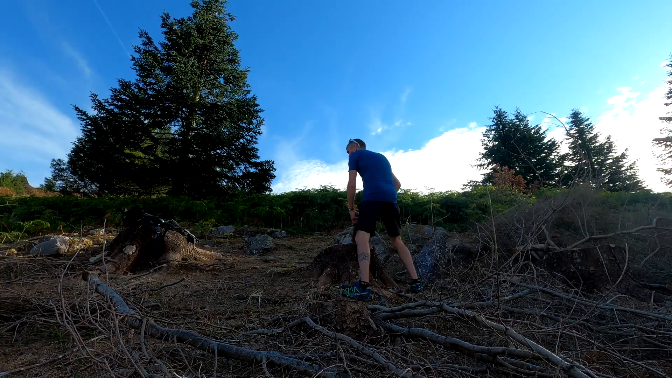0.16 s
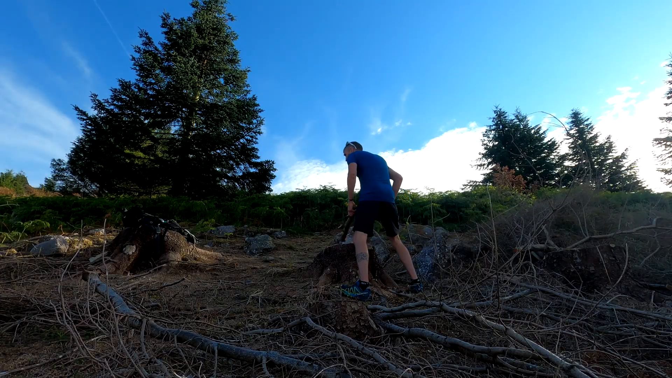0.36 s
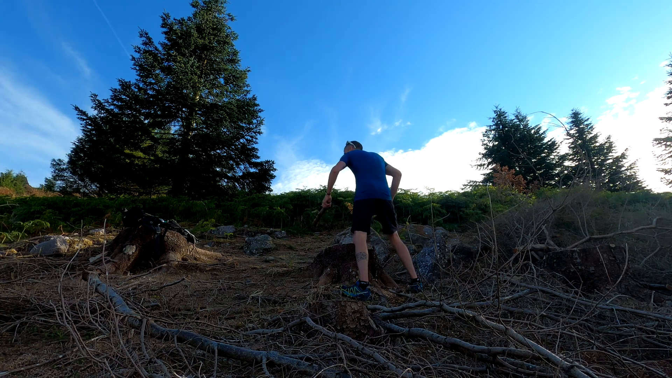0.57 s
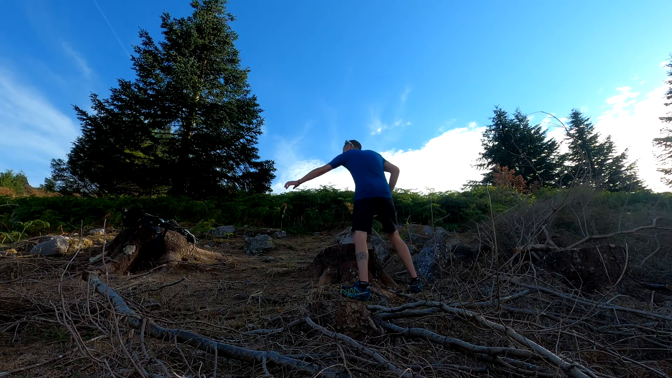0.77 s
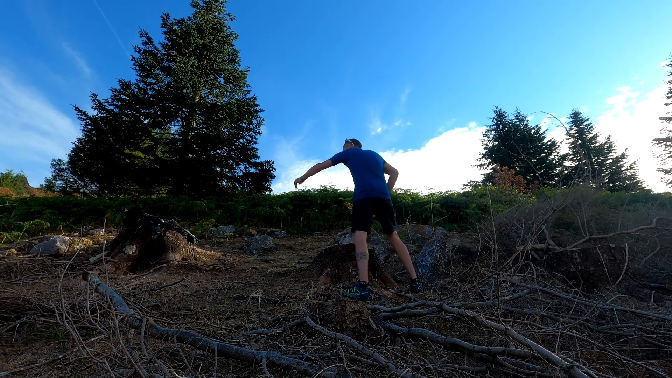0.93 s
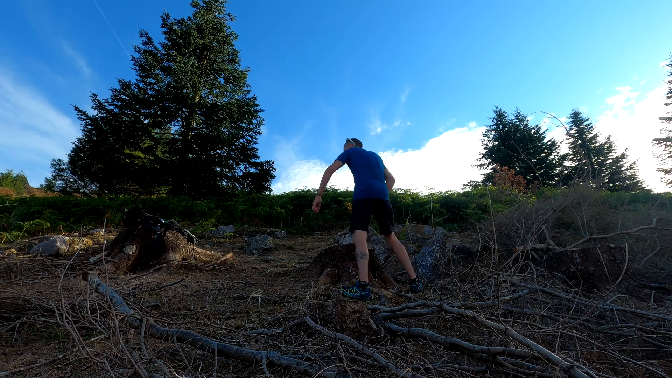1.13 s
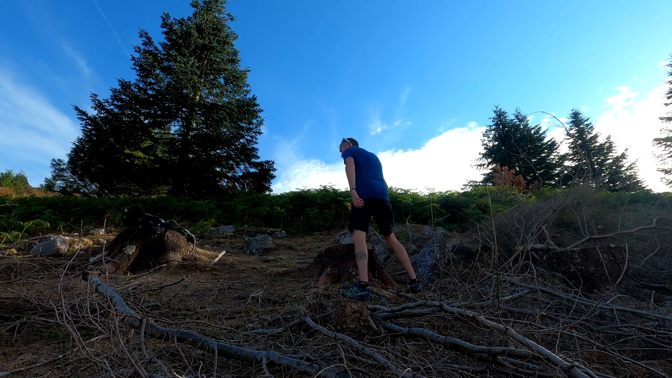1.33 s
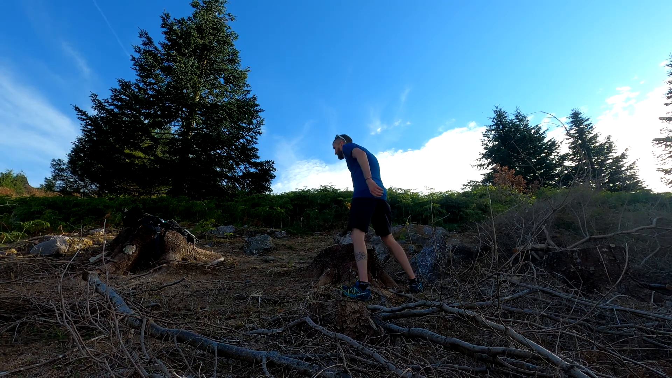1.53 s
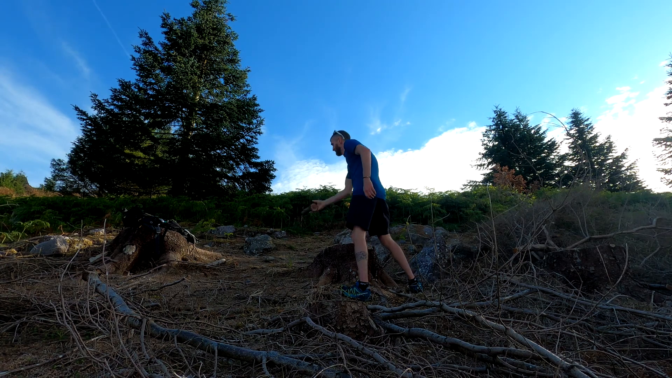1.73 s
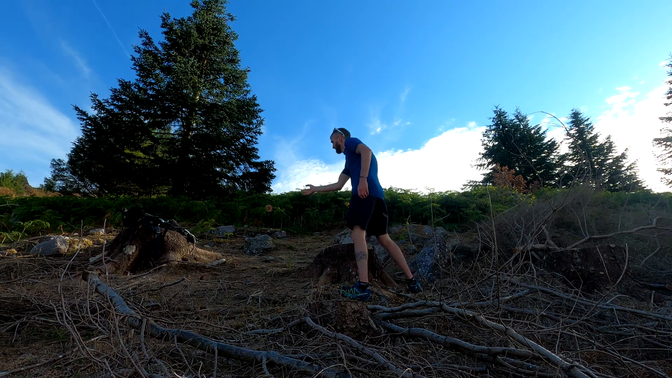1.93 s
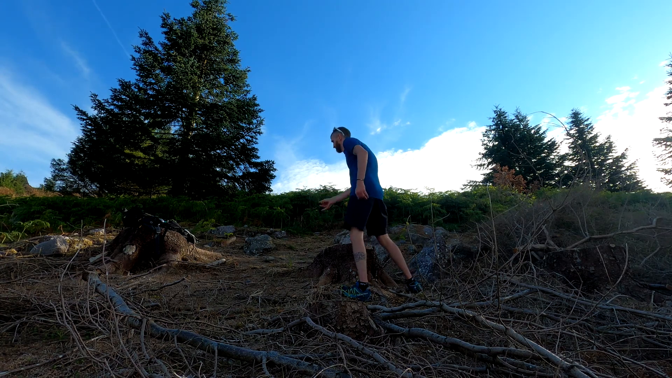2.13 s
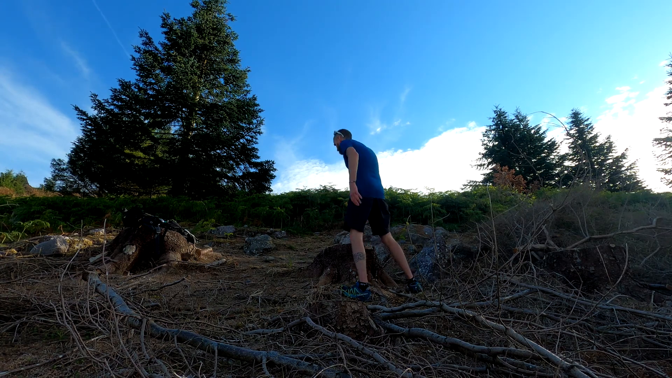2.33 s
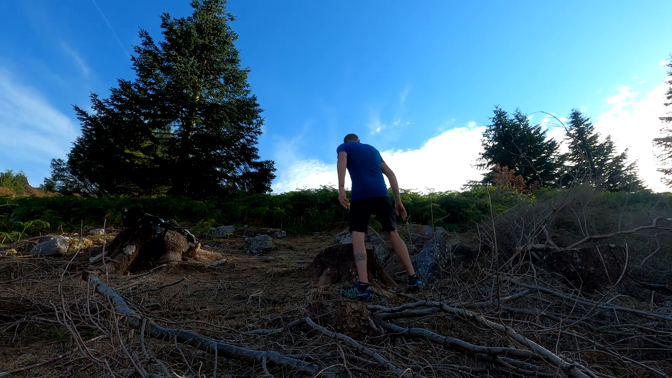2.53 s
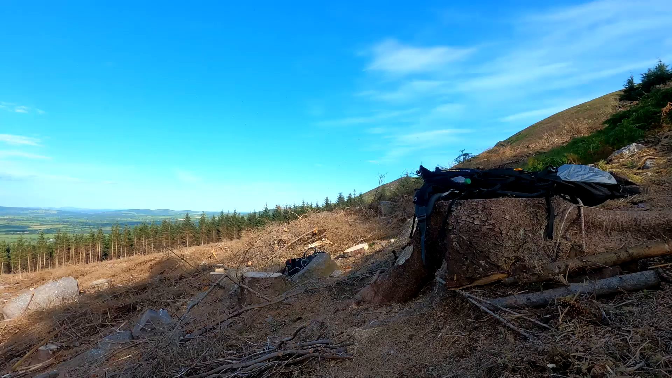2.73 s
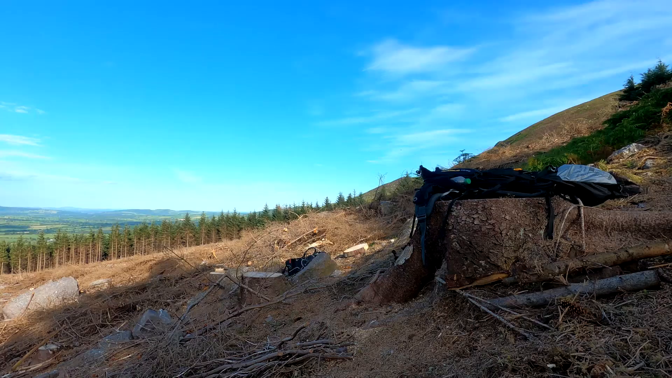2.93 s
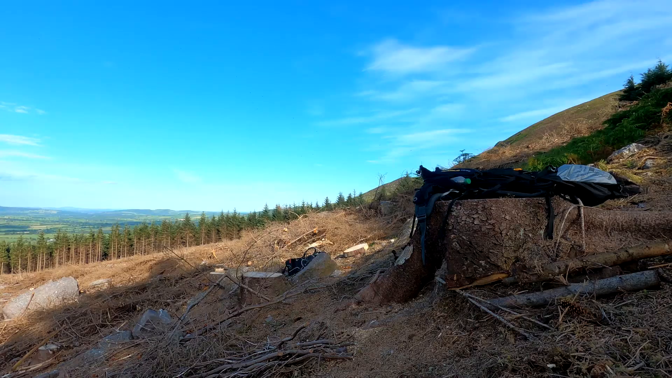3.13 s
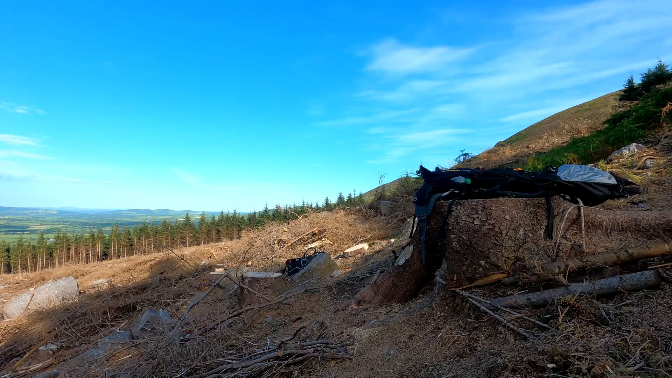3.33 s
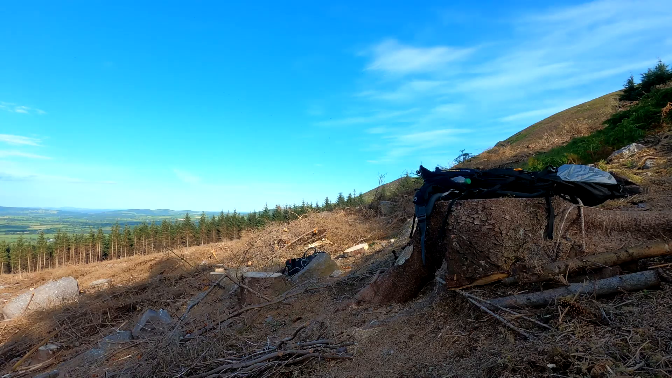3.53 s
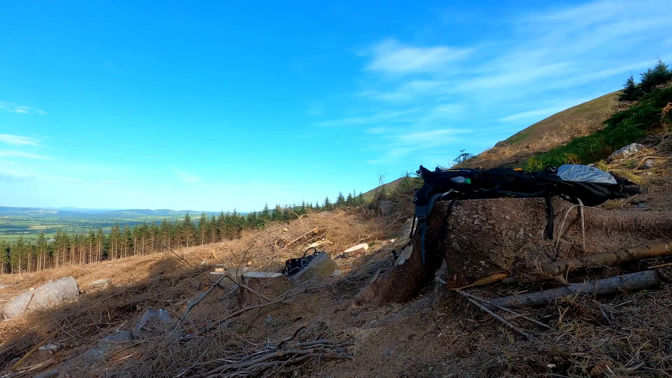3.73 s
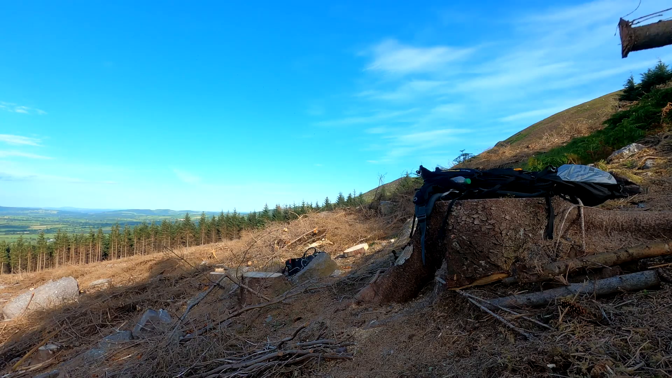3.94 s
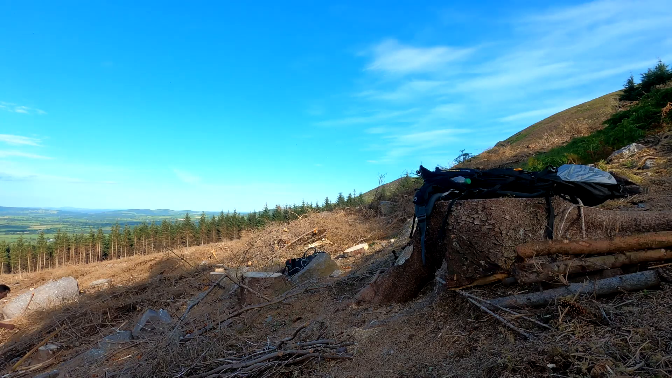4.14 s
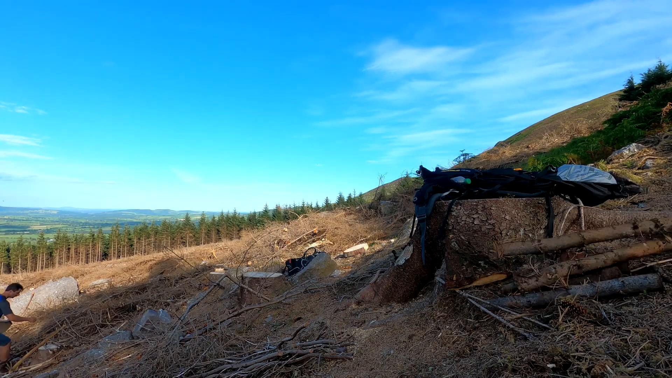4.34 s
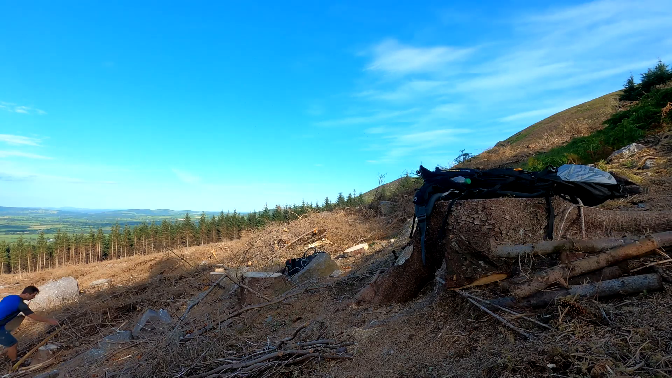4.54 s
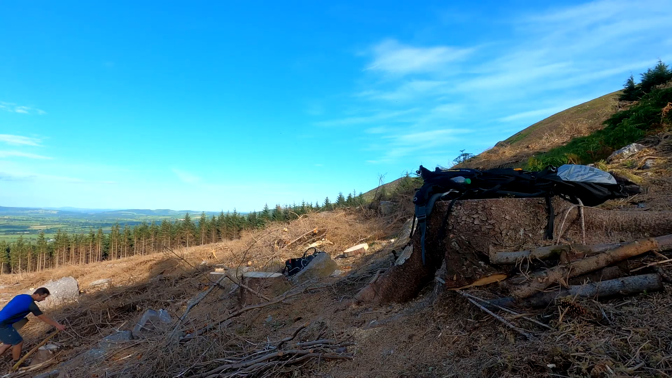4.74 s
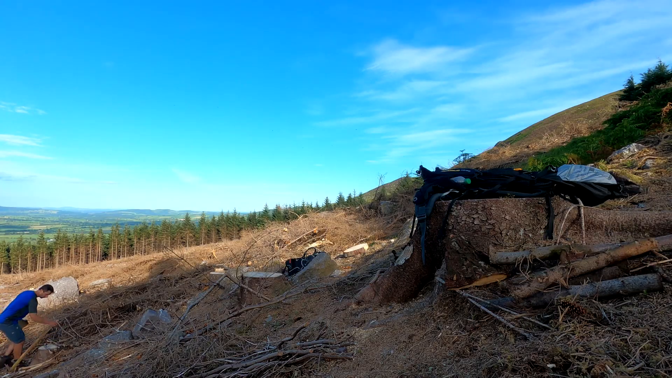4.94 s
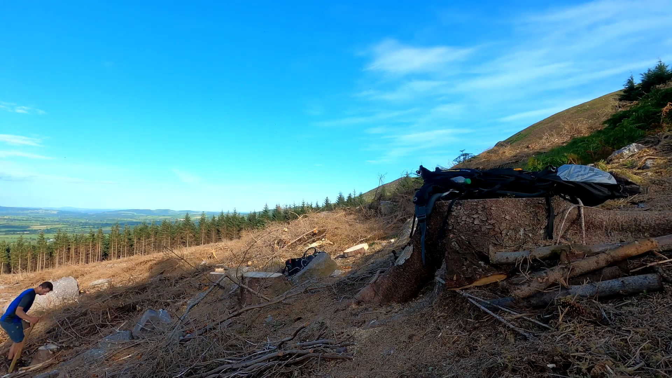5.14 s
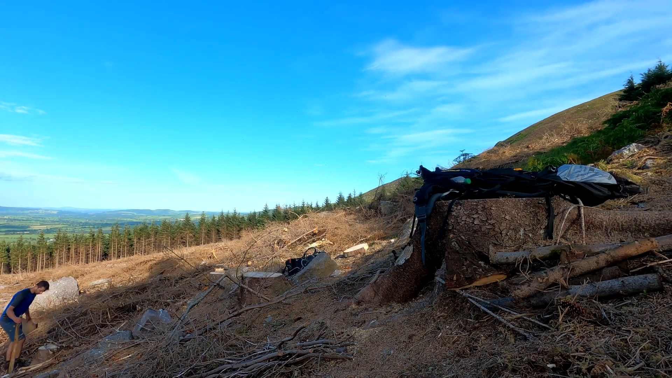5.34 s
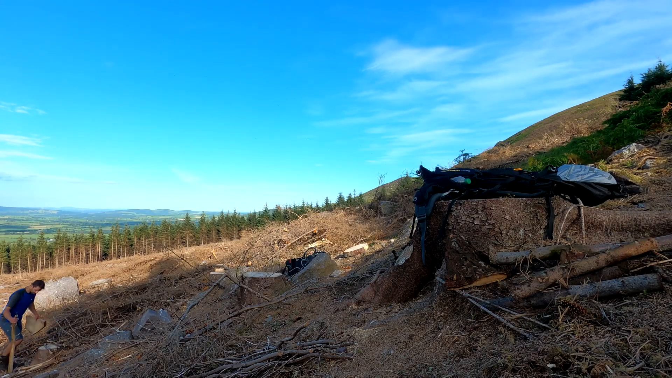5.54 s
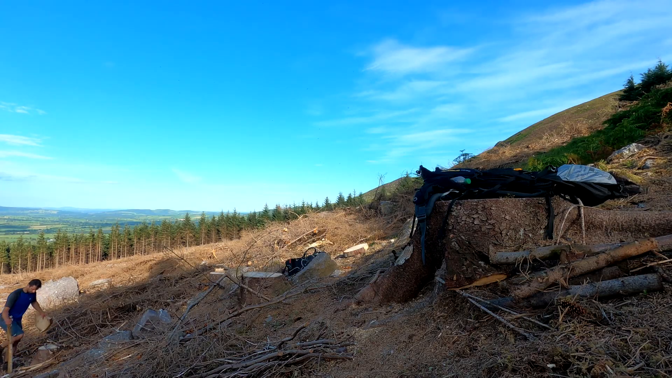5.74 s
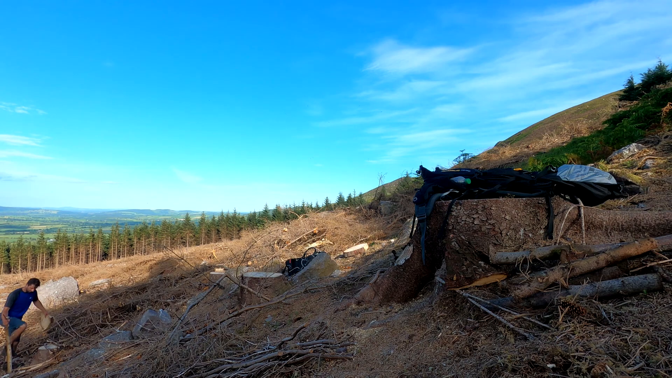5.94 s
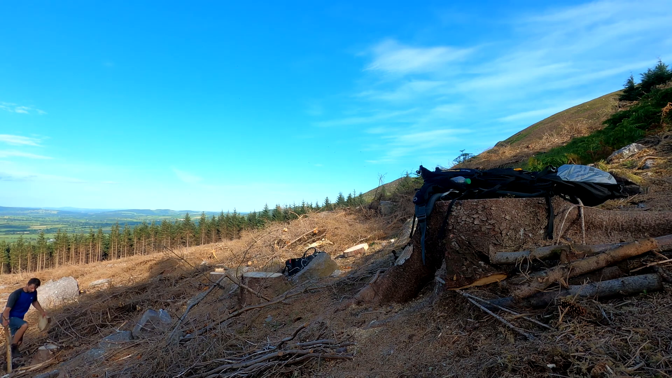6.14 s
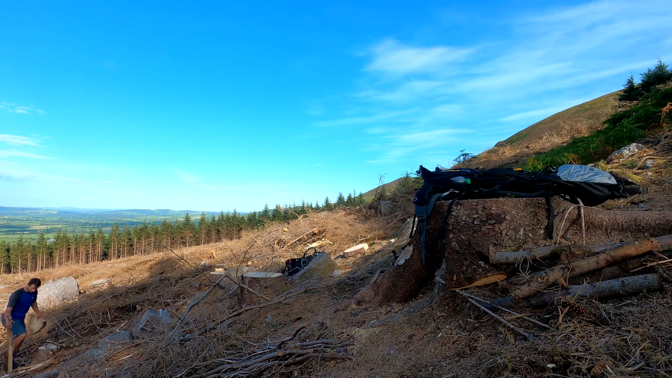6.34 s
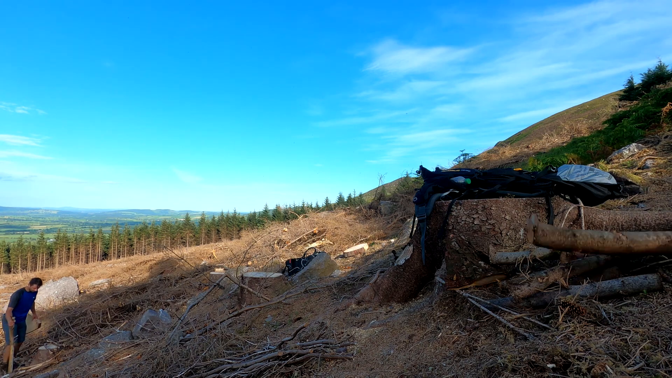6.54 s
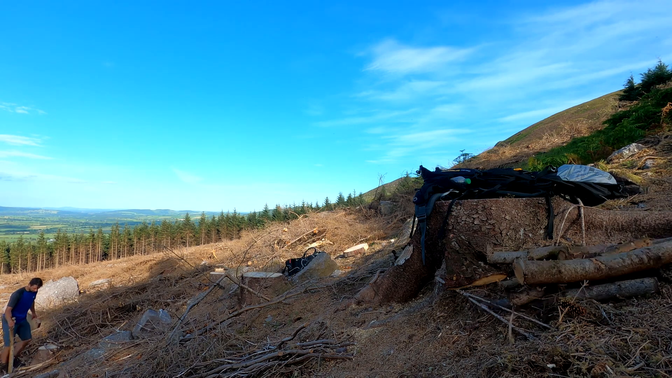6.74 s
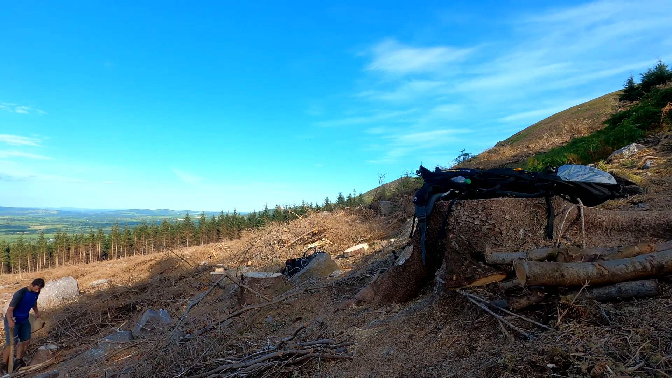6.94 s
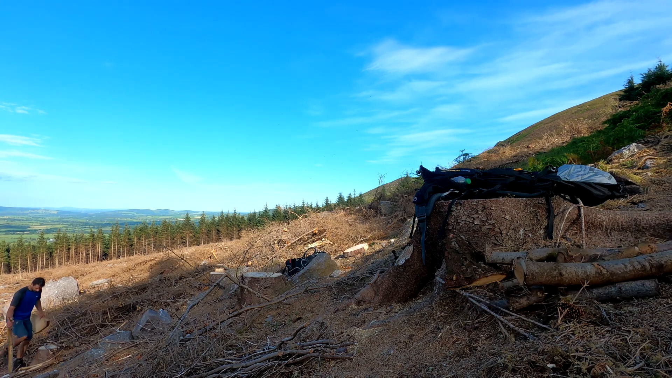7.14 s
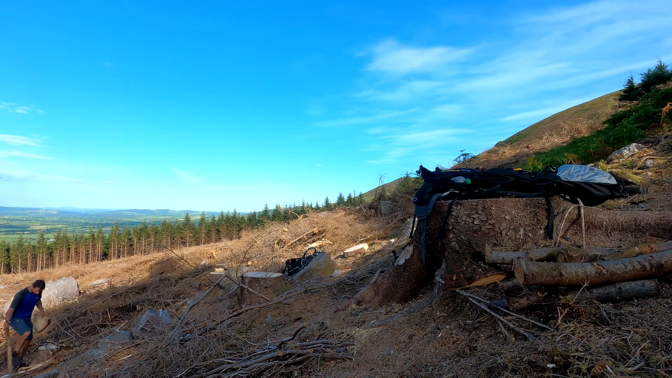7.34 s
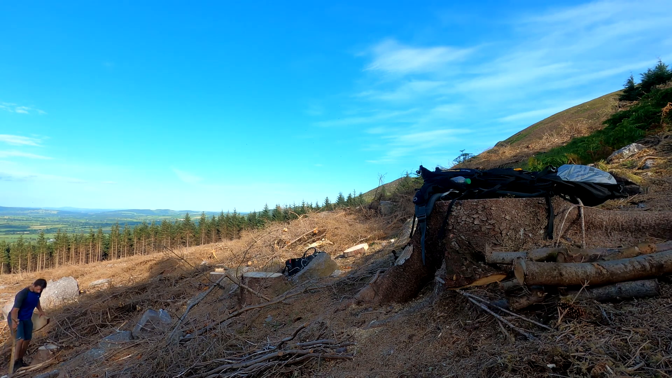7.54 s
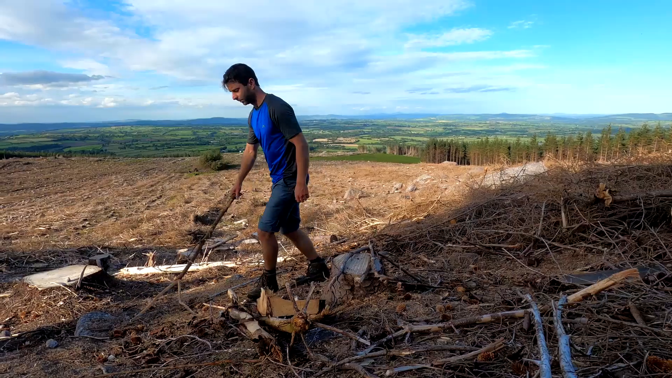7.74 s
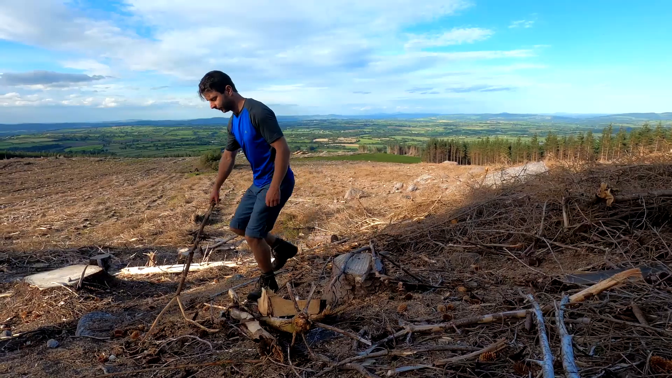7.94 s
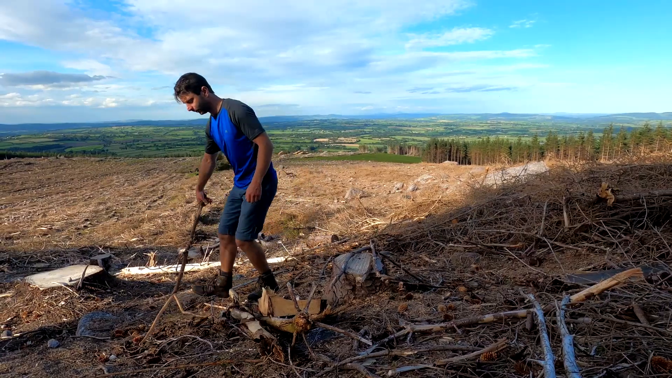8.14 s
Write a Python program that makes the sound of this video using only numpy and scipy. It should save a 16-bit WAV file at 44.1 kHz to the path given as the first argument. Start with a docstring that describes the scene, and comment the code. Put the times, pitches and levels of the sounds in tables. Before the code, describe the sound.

Logs are tossed onto a brushy pile with hollow woody thuds while dry twigs snap, brash crunches and a light breeze blows outdoors.

```python
"""Clearing dead wood on an open, felled hillside, with a light breeze in the trees behind the work.
Feet crunch through dry brash (filtered fracture grains) and twigs snap (noise bursts through resonances).
Four logs are tossed down near the microphone, at about 1.1, 2.3, 4.2 and 6.6 s: each rings in its own
decaying modes over a thud of soft ground. Between the second and third, thick sticks knock and break.
At 7.6 s the sound drops out for about 0.2 s, then returns duller and in mono, with closer steps."""
import sys
import numpy as np
from scipy import signal
from scipy.fft import rfft, irfft, next_fast_len
from scipy.io import wavfile
from scipy.ndimage import map_coordinates

SR = 44100
rng = np.random.default_rng(int(sys.argv[2]) if len(sys.argv) > 2 else 0)


def unload_audio(sound):
    """Save the sound as a 16-bit wav file, at the path given as the first command line argument."""
    columns = np.transpose(np.atleast_2d(sound))
    # keep every value between -1 and 1, then stretch to whole-number steps
    steps = np.round(np.clip(columns, -1, 1) * 32767)
    wavfile.write(sys.argv[1], SR, steps.astype(np.int16))


N = 361179   # length of the scene [samples]

# ringing modes of the four logs: (frequency [Hz], level [dB], t60 [s])
STUB = [(136, 5, 0.15), (297, 6, 0.017), (450, -13.5, 0.18), (1020, -12, 0.079), (1232, -7, 0.054),
        (1966, -44.5, .06)]
THIN_LOG = [(447, -6, 0.15), (995, -14.5, 0.035), (1130, -14, 0.082), (1700, -17, 0.072),
            (2270, -30, 0.061)]
SHORT_LOG = [(159, -12.5, 0.07), (240.7, -25.5, 0.47), (253, 4, 0.04), (335, -3.5, 0.024),
             (650, -10.5, 0.067), (700, -25.5, 0.13), (1050, -13.5, 0.035), (1220, -20, 0.12),
             (1420, -18, 0.025), (1760, -20.5, 0.033)]
LONG_LOG = [(123, -2.5, 0.02), (160.4, -11.5, 0.55), (200, -1, 0.077), (228.7, -1, 0.28), (332, 4.5, 0.03),
            (417, -7.5, 0.19), (454, 2.5, 0.033), (647, -12, 0.12), (850, -12.5, 0.15), (990, -9.5, 0.03),
            (1310, -10.5, 0.076), (1400, -13.5, 0.055)]

STRAIN_S = 0.015   # fibres strain this long before they break
LOG_PAN_DB = -1    # landing logs and their bark lean to the right


def from_db(db):
    """Decibels to gain."""
    return 10 ** (np.asarray(db) / 20)


def rms_one(x):
    """Scale to unit rms."""
    return x / np.sqrt(np.mean(x ** 2) + 1e-20)


def in_time(rows):
    """Each column of a curve at every sample."""
    s, *columns = np.transpose(rows)
    return [np.interp(np.arange(N) / SR, s, c) for c in columns]


def at_hz(points, hz):
    """Read a spectrum on a log-frequency axis."""
    f, value = np.transpose(points)
    return np.interp(np.log(hz + 1), np.log(f), value)


def add(out, s, sound):
    """Mix a sound in from time s."""
    i = int(s * SR)
    out[:, i:i + sound.shape[-1]] += sound[..., :N - i]


def drift(per_s, size=N):
    """A random wander of unit rms, with per_s knots a second."""
    knots = rng.standard_normal(int(per_s * size / SR) + 2)
    return rms_one(np.interp(np.arange(size) * per_s / SR, np.arange(len(knots)), knots))


def band(x, low_hz, high_hz, order=2):
    """Causal band-pass."""
    edges = [low_hz, min(high_hz, 0.45 * SR)]
    return signal.sosfilt(signal.butter(order, edges, "band", fs=SR, output="sos"), x)


def resonate(x, hz, q):
    """One damped resonance."""
    return signal.lfilter(*signal.iirpeak(min(hz, 0.4 * SR), max(q, 0.9), fs=SR), x + 1e-18)


def colour(x, spectrum):
    """Give a signal a smooth spectrum; rms 1."""
    size = next_fast_len(N)
    gain = from_db(at_hz(spectrum, np.fft.rfftfreq(size, 1 / SR)))
    return rms_one(irfft(rfft(x, size) * gain, size)[..., :N])


def panned(pan_db):
    """Left and right gains for a level difference; positive is louder on the left."""
    return from_db(np.array([[0.5], [-0.5]]) * pan_db)


def spread(pair):
    """Two unrelated signals become left and right: alike in the bass, apart in the treble."""
    # likeness of the two microphone channels: (frequency [Hz], correlation [0 to 1])
    likeness = [(100, 0.84), (500, 0.87), (1500, 0.79), (4000, 0.61), (8000, 0.42), (14000, .15)]
    size = next_fast_len(pair.shape[-1])
    mid, side = rfft(pair, size)
    alike = np.clip(at_hz(likeness, np.fft.rfftfreq(size, 1 / SR)), 0, 1)
    width = np.sqrt((1 - alike) / (1 + alike))
    return irfft(mid + side * width * [[1], [-1]], size)[:, :pair.shape[-1]]


def breeze(gust_db=3.5):
    """A low rush from the trees, gusting band by band, with a thin hiss and a faint narrow whine on top."""
    # breeze in the trees: (time [s], level [dB])
    wind = [(0, -63), (.9, -65), (1.4, -59.5), (1.8, -61), (2.2, -62.5), (2.7, -68), (4.0, -68), (5.0, -74),
            (6.4, -68.5), (7.5, -74.5), (7.85, -53.5), (8.19, -71.5)]
    # its spectrum: (frequency [Hz], density [dB per Hz])
    breeze_spectrum = [(20, -6.5), (50, -4.5), (90, -14.5), (160, 1), (220, -3.5), (300, -13), (420, -17.5),
                       (750, -32), (1250, -24.5), (2000, -39), (5400, -37), (7600, -38.5), (9000, -43.5),
                       (16000, -55.5)]
    whine_hz, whine_width_hz, whine_db = 7340, 110, -85.5

    wind_db, = in_time(wind)
    air = colour(spread(rng.standard_normal((2, N))), breeze_spectrum)
    rush = 0
    for hz in (110, 190, 330):   # peel off one low band after another
        low = signal.sosfiltfilt(signal.butter(3, hz, fs=SR, output="sos"), air)
        rush = rush + low * from_db(gust_db * drift(14))
        air = air - low
    whine = rms_one(resonate(rng.standard_normal((2, N)), whine_hz, whine_hz / whine_width_hz))
    return from_db(wind_db) * rms_one(rush + air) + from_db(whine_db) * whine


def brushing():
    """Wood brushes through needles: a bright swish starts quickly and eases off as it slides by."""
    # swishes: (time [s], length [s], level before the envelope [dB])
    swishes = [(1.043, 0.066, -69.5), (1.134, 0.041, -53), (1.359, 0.135, -55), (1.744, 0.078, -69),
               (2.035, 0.025, -65.5), (2.255, 0.081, -50.5), (2.469, 0.032, -72)]
    out, t = np.zeros((2, N)), np.arange(SR // 4) / SR
    for s, length, db in swishes:
        hiss = rms_one(band(spread(rng.standard_normal((2, len(t)))), 2500, 7600))
        slide = np.interp(t / length, [0, 0.06, 0.6, 1.15], [0.078, 0.89, 0.55, 0.042])
        add(out, s, from_db(db) * hiss * slide)
    return out


def squeaking(slips_per_s=500, q=22):
    """A branch dragged over another sticks and slips in quick uneven jerks that ring it."""
    # squeaks: (time [s], length [s], level [dB], pitch [Hz])
    squeaks = [(3.996, 0.026, -63.5, 1900), (5.089, 0.017, -57, 3550), (5.119, 0.026, -53.5, 2350)]
    # resonances of the branch: (ratio to the pitch, level [dB])
    squeak_modes = [(1, 7.5), (1.5, -7), (1.9, -5.5)]
    out, t = np.zeros((2, N)), np.arange(SR // 10) / SR
    for s, length, db, hz in squeaks:
        slips = (rng.random(len(t)) < slips_per_s / SR) + 0.052 * rng.standard_normal(len(t))
        slips = slips * np.sin(np.pi * np.minimum(t / length, 1)) ** 0.5
        ring = sum(from_db(mode_db) * resonate(slips, hz * ratio, q) for ratio, mode_db in squeak_modes)
        add(out, s, from_db(db) * ring * np.sqrt(length * SR) / np.linalg.norm(ring))
    return out


def grains(per_s, size_db, low_hz, high_hz, count=8):
    """Tiny fractures of uneven size ring at a few twig pitches over the smooth noise of rubbing."""
    q, rub_db = 3.0, -2
    at = rng.integers(0, N, int(per_s * N / SR))
    sizes = from_db(size_db * np.minimum(rng.exponential(1, len(at)), 4.5))
    sizes = sizes * rng.choice([-1, 1], (2, len(at)))
    out = np.zeros((2, N))
    for k, hz in enumerate(np.geomspace(low_hz, high_hz, count)):
        clicks = np.zeros((2, N))
        clicks[:, at[k::count]] = sizes[:, k::count]
        out += resonate(clicks, hz, q) / np.sqrt(hz)
    rub = rms_one(band(rng.standard_normal((2, N)), low_hz / 2, high_hz * 2, order=1))
    return spread(rms_one(out) + from_db(rub_db) * rub)


def crackles(size_db, cycles, crack_db=-5, per_s=70):
    """Lone small twigs give way, each with a broad crack and a short tick at its own pitch; rms 1."""
    out, t = np.zeros((2, N)), np.arange(SR // 50) / SR
    pitches = np.geomspace(600, 6500, 64)
    crack = rms_one(band(1.0 * (t == 0), 700, 6500))
    for when, size, side, twig in rng.random((int(per_s * N / SR), 4)):
        hz = pitches[int(twig * len(pitches))]
        tick = rms_one(from_db(-60 * t * hz / cycles) * np.sin(2 * np.pi * hz * t))
        sound = from_db(size_db * size) * (tick + from_db(crack_db) * crack)
        add(out, when * N / SR, sound * panned(8 * (side - 0.5)))
    return rms_one(out)


def pressing(held_s, press_s):
    """Gain of one crunch: it builds up, holds, then dies away."""
    relax_db_per_s = 176.5
    t = np.arange(SR) / SR - press_s
    return np.clip(1 + t / press_s, 0, 1) ** 2 * from_db(-relax_db_per_s * np.maximum(t - held_s, 0))


def flecked(x):
    """Narrow patches of the spectrum rise and fall at random, which makes it flecked and slightly tonal."""
    fleck_db, flecks_per_octave, flecks_per_s = 2.3, 16, 70
    hz, s, cells = signal.stft(x, SR, nperseg=512, noverlap=384)
    rows = np.log2(1 + hz / 500) * flecks_per_octave
    row, column = np.meshgrid(rows, s * flecks_per_s, indexing="ij")
    chance = rng.standard_normal((int(row.max()) + 2, int(column.max()) + 2))
    flecks = rms_one(map_coordinates(chance, [row, column], order=1))
    gain = rms_one(from_db(fleck_db * flecks))
    return signal.istft(cells * gain, SR, nperseg=512, noverlap=384)[1][:, :N]


def trampling(soil_db=-2, twig_db=2.0, needle_db=4.5, crackle_db=-4, fits_db=0.73, patchy_db=1.0,
              pan_db=1.2):
    """Feet and dragged wood scuff soil, crush twigs and stir dry needles; the brash gives way in fits."""
    # light stirring of the brash, one curve for each bout of work: (time [s], relative level [dB])
    stir = [
        [(0.0, -79), (0.74, -73.5), (0.88, -84), (1.52, -73), (2.03, -81.5), (2.5, -76.5)],
        [(2.55, -67.5), (2.8, -58), (3.292, -57), (3.706, -61), (3.97, -65), (4.05, -73.5)],
        [(4.1, -72.5), (4.21, -60.5), (4.38, -58), (4.89, -63), (5.66, -62), (6.25, -63.5), (6.42, -76)],
        [(6.47, -66), (6.544, -59), (6.672, -80), (6.744, -54), (7.054, -64.5), (7.4, -62)],
    ]
    # feet and logs pressing into the brash:
    # (time [s], held [s], relative needle rustle [dB], weight = soil against needles [dB])
    crunches = [(0.01, 0.0065, -65.5, -5), (0.531, 0.012, -52.5, -21.5), (0.679, 0.092, -67, -29.5),
                (2.696, 0.003, -58, -2), (2.788, 0.056, -57, 3.5), (3.098, .17, -60, 11),
                (3.43, 0.03, -64.5, 11), (3.578, 0.0071, -55, -1), (3.726, 0.063, -56.5, 9),
                (4.23, 0.042, -54.5, -14.5), (4.379, 0.072, -54, -16), (4.561, 0.049, -58.5, -32.5),
                (5.09, 0.016, -68, -2), (5.45, 0.12, -65.5, -4), (5.729, 0.021, -64.5, 9),
                (6.6, .04, -65.5, 5), (6.768, 0.048, -56.5, 0), (7.479, 0.22, -63, 2),
                (7.812, 0.097, -61, 0.5), (7.903, 0.014, -49.5, -4), (7.95, 0.03, -56, -21),
                (8.059, 0.011, -57.5, -13), (8.083, 0.0075, -70, 13.5)]
    # spectra of the three layers: (frequency [Hz], density [dB per Hz])
    soil_spectrum = [(60, -27), (150, -4.5), (330, 0), (700, 0), (1000, -7), (1800, -29.5)]
    twig_spectrum = [(500, -27), (900, -7), (1400, 0.5), (2300, -0.5), (3000, -8), (5000, -36)]
    needle_spectrum = [(1500, -32), (2600, -3.5), (4000, -4), (5500, -1.5), (7400, -8), (9000, -16.5),
                       (12500, -20), (16000, -26)]
    stir_trim_db, stir_weight_db = -6, 0.5   # weight: soil against needles
    press_s = 0.025       # a crunch builds up to its time
    twig_share = 0.6      # twig crackle lies between needle rustle (0) and soil scuff (1)
    crackle_rise = 0.32   # lone twigs give way mostly under load: extra power law on the rustle

    stir_db, = in_time(np.vstack(stir))
    power = from_db(stir_db + stir_trim_db + np.array([[0], [stir_weight_db]])) ** 2
    for s, held_s, db, weight_db in crunches:
        press = from_db([[db], [db + weight_db]]) * pressing(held_s, press_s)
        add(power, max(s - press_s, 0), press ** 2)
    light, heavy = power
    between = light * (heavy / light) ** twig_share
    loaded = light * (light / light.max()) ** crackle_rise

    soil = colour(grains(450, size_db=3.6, low_hz=205, high_hz=1000), soil_spectrum)
    twigs = colour(grains(1100, size_db=4.0, low_hz=950, high_hz=3000), twig_spectrum)
    needles = colour(grains(1900, size_db=3.8, low_hz=2500, high_hz=8600), needle_spectrum)
    lone_twigs = crackles(size_db=20.5, cycles=16)
    layers = [(soil, soil_db, heavy), (twigs, twig_db, between),
              (needles, needle_db, light), (lone_twigs, crackle_db, loaded)]
    together = drift(90)
    crunch = 0
    for sound, db, level in layers:
        crunch = crunch + sound * np.sqrt(level) * from_db(db + patchy_db * drift(35))
    return flecked(crunch) * from_db(fits_db * together) * panned(pan_db)


def snap(hz, knock_db, clatter_db, splinter_db, t60, crack_db, grain_db=6.5, strain_db=-21, tail_db=-23,
         tail_t60=0.24, burst_s=0.0025, air_db=-7, spit_db=-12, modes_db=12, mode_width_hz=90):
    """Straining fibres fracture and ring the twig; splinters follow and the brash scatters a faint tail."""
    echo_s, echo_db = 0.0018, -16.5   # every crack also bounces off the ground
    treble_pan_db = 2                 # the top of every crack leans to the left
    t = np.arange(SR // 6) / SR - STRAIN_S   # zero at the break
    rough_db = grain_db * np.repeat(rng.standard_normal(len(t)), 30)[:len(t)]
    splintering = from_db(rough_db - 60 * np.abs(t) / max(t60, 0.005))
    tearing = splintering + from_db(tail_db - 60 * t / tail_t60)
    straining = from_db(rough_db + strain_db) * np.clip(1 + t / STRAIN_S, 0, 1) ** 2
    burst = rng.standard_normal((2, len(t))) * np.where(t < 0, straining, tearing)

    # the break runs through the twig in two steps
    steps = ((STRAIN_S + np.array([0.0003, rng.uniform(0.0006, 0.0012)])) * SR).astype(int)
    burst[0, steps] += from_db(crack_db) * np.linalg.norm(burst[0]) * np.array([0.85, -0.5])
    echo = np.roll(burst, int(echo_s * SR), axis=1)
    burst = spread(burst + from_db(echo_db) * echo)

    # one broad resonance and four narrow modes around it
    narrow = sum(resonate(burst, hz * ratio, hz / mode_width_hz) for ratio in rng.uniform(0.7, 1.5, 4))
    ringing = burst + 9.5 * resonate(burst, hz, 2.9) + from_db(modes_db) * narrow
    knock = band(ringing, 73, 360)
    clatter = band(ringing, 480, 2000, order=4)
    thinness = max(hz / 4500, 1)   # thin, high twigs spit far more treble
    air = band(ringing, 6500, 8600, order=3)
    spit = band(burst, 9500, 15000)
    treble = from_db(air_db) * thinness * air + from_db(spit_db) * hz / 4500 * spit
    splinter = band(ringing, 2500, 6000, order=3) - treble * panned(treble_pan_db)

    # each level is the rms that its band would have, were its energy spread evenly over burst_s
    out = 0
    for part, db in ((knock, knock_db), (clatter, clatter_db), (splinter, splinter_db)):
        out = out + part * from_db(db) * np.sqrt(burst_s * SR) / np.linalg.norm(part.mean(axis=0))
    return out


def breaking_wood():
    """Thin twigs mostly splinter, thick sticks clatter and knock, bark cracks under the landing logs."""
    # thin twigs snapping: (time [s], splinter level [dB], pitch [Hz],
    # woody body against the splinters [dB], t60 [s], held to 5 ms or more, left against right [dB])
    twig_snaps = [(0.518, -41, 7300, -25, 0.0042, 3), (0.5257, -21.5, 7300, -28, 0.014, 7.5),
                  (0.527, -24.5, 4240, -23.5, 0.018, 7), (0.544, -37, 4200, -23, 0.036, 8),
                  (0.563, -49, 7300, -23, .015, 3), (0.604, -46.5, 4270, -3, 0.038, 11),
                  (0.624, -41.5, 4740, -28, 0.09, 0), (0.684, -48, 4650, -22, 0.03, 10),
                  (1.726, -54.5, 5560, -4, .024, -5.5), (2.173, -51, 3400, -9, 0.015, -1),
                  (2.261, -34.5, 3630, -8, 0.025, -0.5), (2.275, -46, 2000, -1, .015, 0),
                  (2.305, -46, 4520, -8, 0.013, 1), (2.323, -46, 3870, -11, .015, 0),
                  (2.546, -46.5, 6300, -14, 0.13, -5), (2.645, -50.5, 5900, -18, .02, 0),
                  (2.703, -44, 2800, -16, .025, -5), (2.797, -28, 5330, 0.5, 0.022, 2.5),
                  (2.823, -37, 5500, -5, 0.043, 0), (3.367, -52, 5600, 2, .02, 2),
                  (4.203, -25, 3640, -3, 0.037, 3), (4.412, -35, 4400, -23, 0.15, 0),
                  (4.437, -28.5, 3910, -22, 0.045, 4), (4.504, -42.5, 2780, -24, 0.014, -2),
                  (4.678, -33, 3360, -12.5, 0.023, -2), (4.854, -44.5, 4860, -6, 0.051, 0.5),
                  (4.907, -47.5, 5460, -8, 0.057, 1), (5.156, -51, 7100, -29, .02, -1),
                  (5.333, -44, 4400, -16, 0.027, 1), (5.373, -43, 5800, -19, 0.049, 1),
                  (6.602, -44, 5050, -11.5, 0.032, 2), (6.636, -24.5, 4520, -19, 0.014, -2),
                  (6.71, -37.5, 3270, -16, 0.024, 0), (6.74, -41.5, 2940, 2.5, 0.027, -2.5),
                  (6.782, -37, 3330, -13, 0.034, -2), (7.321, -31.5, 5540, -8, 0.026, 2),
                  (7.393, -42, 6470, -20.5, 0.048, 1), (7.459, -17, 4700, -21, 0.014, 2),
                  (7.468, -24.5, 4500, -13.5, 0.016, -1), (7.4813, -17, 4600, -16, 0.009, 1.5),
                  (7.488, -28, 4200, -11, .01, 0), (7.839, -40, 3140, -6, 0.04, -7),
                  (7.851, -45, 3350, -6, .02, -3), (7.873, -42, 2820, -4, .025, 0),
                  (7.896, -27, 5030, -23, 0.086, 7), (7.909, -33, 4200, -8, .04, -8),
                  (7.976, -42.5, 3850, -10, .06, 3), (8.013, -40, 4250, -13, 0.013, -3),
                  (8.081, -37.5, 4540, -5.5, 0.027, -5), (8.144, -55, 2800, -2, .04, 0)]
    # thick sticks knocking and breaking: (time [s], clatter level [dB], pitch [Hz])
    stick_knocks = [(2.172, -50.5, 1200), (2.764, -50.5, 1760), (2.835, -37.5, 1190), (2.993, -54.5, 990),
                    (3.059, -46, 724), (3.152, -42, 513), (3.191, -41, 580), (3.248, -44, 606),
                    (3.282, -30.5, 700), (3.401, -43.5, 730), (3.426, -42, 610), (3.555, -48, 610),
                    (3.575, -44, 825), (3.674, -47, 685), (3.722, -33.5, 696), (3.75, -43, 695),
                    (3.758, -23, 2000), (3.783, -22.5, 940), (3.827, -54, 1200), (3.922, -54, 800),
                    (4.137, -37.5, 740), (4.285, -46.5, 1500), (4.4, -49, 1020), (4.683, -43.5, 1920),
                    (5.716, -46, 960), (5.763, -46, 850), (5.783, -45, 705), (5.884, -43, 870),
                    (5.929, -47.5, 630), (6.005, -44.5, 1460), (6.202, -48.5, 674), (6.507, -50, 496),
                    (6.778, -45, 560), (7.114, -43, 900), (7.805, -51, 477), (7.862, -42.5, 670)]
    # the thicker the stick, the more low knock: (pitch [Hz], knock against the clatter [dB])
    knock_by_pitch = [(500, 3), (700, -13), (1800, -12)]
    # bark cracking as the logs land:
    # (time [s], clatter level [dB], pitch [Hz], splinters against the clatter [dB])
    bark_cracks = [(1.147, -41.5, 1190, -5.5), (2.286, -33.5, 1120, -9.5), (4.196, -16.5, 1080, -8.5),
                   (4.203, -25, 720, 0.5), (4.228, -22, 2180, -8.5), (6.615, -37.5, 1400, -0.5),
                   (6.631, -13, 1027, -10.5), (6.637, -15.5, 487, -13)]
    twig_knock_db = -12.5   # low knock against the woody body
    stick_pan_db = 2

    out = np.zeros((2, N))
    lead_s = STRAIN_S - 0.001
    for s, db, hz, body_db, t60, pan_db in twig_snaps:
        crack = snap(hz, body_db + twig_knock_db, body_db, 0, t60, crack_db=-2)
        add(out, s - lead_s, from_db(db) * panned(pan_db) * crack)
    for s, db, hz in stick_knocks:
        crack = snap(hz, at_hz(knock_by_pitch, hz), 0, splinter_db=-12, t60=0.03, crack_db=4)
        add(out, s - lead_s, from_db(db) * panned(stick_pan_db) * crack)
    for s, db, hz, splinter_db in bark_cracks:
        crack = snap(hz, -9, 0, splinter_db, t60=0.027, crack_db=-8.5)
        add(out, s - lead_s, from_db(db) * panned(LOG_PAN_DB) * crack)
    return out


def struck(modes, swell_cycles, settle_s=0.285, rocking=0):
    """Modes swell over a soft contact, sag in pitch as the load eases, waver if rocking, and come to rest."""
    sag_share, sag_s = 0.05, 0.016   # wood rings sharp while it is pressed by the blow
    rock_db, rock_share, rocks_per_s = 3, 0.013, 70   # level and pitch waver at a rocking of 1
    t = np.arange(SR // 2) / SR
    sag = sag_share * np.exp(-t / sag_s)
    rock_onset = np.minimum(t * rocks_per_s, 1)
    ring = 0
    for k, (hz, db, t60) in enumerate(modes):
        level = rocking * drift(rocks_per_s, size=len(t)) * rock_onset
        bend = rocking * drift(rocks_per_s, size=len(t)) * rock_onset
        phase = 2 * np.pi * hz * np.cumsum(1 + sag + rock_share * bend) / SR
        decay = from_db(db + rock_db * level - 60 * t / t60)
        swell = 1 - np.exp(-t * hz / swell_cycles)   # low modes take longer
        ring = ring + (-1) ** k * decay * swell * np.sin(phase)
    return ring / (1 + (t / settle_s) ** 10)


def bumping():
    """A branch, jolted or broken, gives one short hollow note."""
    # ringing branches: (time [s], level [dB], pitch it settles to [Hz], t60 [s])
    bumps = [(0.53, -37, 177, 0.054), (2.33, -32.5, 110, 0.038), (2.798, -33, 335, .04),
             (3.152, -33.5, 470, 0.051), (3.192, -34, 578, 0.052), (3.215, -39, 510, 0.055),
             (3.282, -34.5, 220, 0.028), (3.723, -35, 300, 0.049), (3.759, -27, 274, 0.036),
             (3.785, -33.5, 182, .045), (4.199, -17, 1090, .03), (4.229, -24, 1237, 0.047),
             (4.346, -39.5, 1150, 0.038), (4.353, -44.5, 1720, 0.05), (6.777, -31.5, 517, 0.031),
             (7.4605, -14, 4030, .02), (7.4695, -19, 4030, .018), (7.483, -13, 4030, .013),
             (7.853, -45, 330, 0.022), (7.897, -43, 211, .04), (7.9, -38.5, 463, 0.039)]
    out = np.zeros((2, N))
    for s, db, hz, t60 in bumps:
        add(out, s, from_db(db) * struck([(hz, 0, t60)], swell_cycles=0.4))
    return out


def footfalls():
    """Soles knock dully on a stump, close by, and set off its decaying modes."""
    # shoes coming down: (time [s], level [dB])
    steps = [(7.805, -38), (7.813, -41), (8.084, -29.5), (8.09, -31.5)]
    # modes of the stump: (frequency [Hz], level [dB], t60 [s])
    stump = [(249, -3.5, .06), (366, -8.5, 0.027), (458, -0.5, 0.025)]
    out = np.zeros((2, N))
    for s, db in steps:
        add(out, s, from_db(db) * struck(stump, swell_cycles=0.76))
    return out


def rolling():
    """A log rolls to rest with a rough groan that glides as its point of contact moves."""
    # logs rolling to rest on the pile: (time [s], length [s], level [dB], from [Hz], to [Hz])
    rolls = [(4.36, 0.071, -45.5, 312, 383), (4.44, 0.06, -51, 340, 357), (6.825, 0.067, -36.5, 205, 150),
             (6.82, 0.051, -45, 400, 460)]
    rough_db, wobble_share, jolts_per_s = 4.5, 0.12, 190
    out, t = np.zeros((2, N)), np.arange(SR // 5) / SR
    for s, length, db, from_hz, to_hz in rolls:
        done = np.minimum(t / length, 1)
        glide = from_hz + (to_hz - from_hz) * done
        hz = glide * (1 + wobble_share * drift(jolts_per_s, size=len(t)))
        gain = from_db(db + rough_db * drift(jolts_per_s, size=len(t))) * np.sin(np.pi * done)
        add(out, s, gain * np.sin(2 * np.pi * np.cumsum(hz) / SR))
    return out


def falling_logs():
    """Logs land, ring and tumble on the rumbling brash; the ground thuds under them."""
    # logs bumping, landing and tumbling: (time [s], level [dB], rings freely for [s],
    # softness of the contact [cycles], modes of the log)
    landings = [(0.488, -49.5, 0.085, 0.45, SHORT_LOG), (0.529, -46.5, .1, 0.2, STUB),
                (0.628, -53, 0.13, 0.21, STUB), (1.148, -32.5, 0.18, 1.0, STUB),
                (2.260, -39, 0.061, .6, THIN_LOG), (2.287, -17, 0.1, 0.64, THIN_LOG),
                (4.204, -8.5, 0.19, .6, SHORT_LOG), (4.398, -45, 0.06, 0.59, SHORT_LOG),
                (4.446, -44, 0.082, 1.2, SHORT_LOG), (4.681, -41, 0.079, 0.88, SHORT_LOG),
                (4.857, -48, 0.087, 1.4, SHORT_LOG), (6.634, -14.5, 0.2, 0.39, LONG_LOG),
                (6.777, -41, 0.038, 0.36, LONG_LOG)]
    # weight meeting the ground: (time [s], level [dB])
    thuds = [(0.526, -50), (.625, -50), (0.678, -43.5), (1.16, -19), (1.501, -46), (2.326, -35),
             (2.358, -40), (4.211, -14), (4.393, -38), (4.684, -48), (4.86, -53), (6.619, -9.5),
             (6.645, -9), (6.725, -26.5), (6.826, -32.5), (6.955, -42), (7.498, -37.5), (8.081, -43)]
    # modes of the soft ground: (frequency [Hz], level [dB], t60 [s])
    ground = [(47.3, -1.5, 0.22), (67, -5.5, 0.034), (91.5, -10.5, 0.13), (126, -1.5, 0.026)]
    rumble_db, rumble_t60_s = -27, 0.15   # brash crushed under the log, against the landing

    out, t = np.zeros((2, N)), np.arange(SR // 2) / SR
    for s, db, free_s, softness, modes in landings:
        crushed = rms_one(band(rng.standard_normal(len(t)), 70, 400))
        rumble = crushed * from_db(rumble_db - 60 * t / rumble_t60_s) / (1 + (t / free_s) ** 4)
        ring = struck(modes, softness, free_s, rocking=0.84)
        add(out, s, from_db(db) * panned(LOG_PAN_DB) * (ring + rumble))
    for s, db in thuds:
        add(out, s, from_db(db) * struck(ground, swell_cycles=0.85, settle_s=0.1))
    return out


def from_the_right(pair):
    """The sound reaches the left microphone a moment later."""
    lag_s = 0.00005   # cut to whole samples
    return np.array([np.roll(pair[0], int(lag_s * SR)), pair[1]])


def scene():
    """All sources in the open air."""
    brash = trampling() + brushing()
    wood = breaking_wood() + bumping()
    logs = from_the_right(falling_logs() + rolling())
    return brash + wood + logs + footfalls() + squeaking() + breeze()


def record(dry):
    """The sound drops out, returns duller and in mono, and lacks its very top throughout."""
    stop_s, resume_s = 7.598, 7.795   # silent from the first; back at full level by the second
    mono_top_hz, cutoff_hz = 7100, 15800
    t = np.arange(N) / SR
    before = np.clip((stop_s - t) / 0.00191, 0, 1)
    after = np.clip((t - resume_s) / 0.008 + 1, 0, 1)
    dulling = signal.butter(1, min(mono_top_hz, 0.45 * SR), fs=SR, output="sos")
    mono = signal.sosfilt(dulling, dry.mean(axis=0))
    heard = dry * before + mono * after
    return signal.sosfilt(signal.ellip(10, 0.1, 90, cutoff_hz, fs=SR, output="sos"), heard + 1e-18)


dry = scene()
out = record(dry)
unload_audio(out)
```